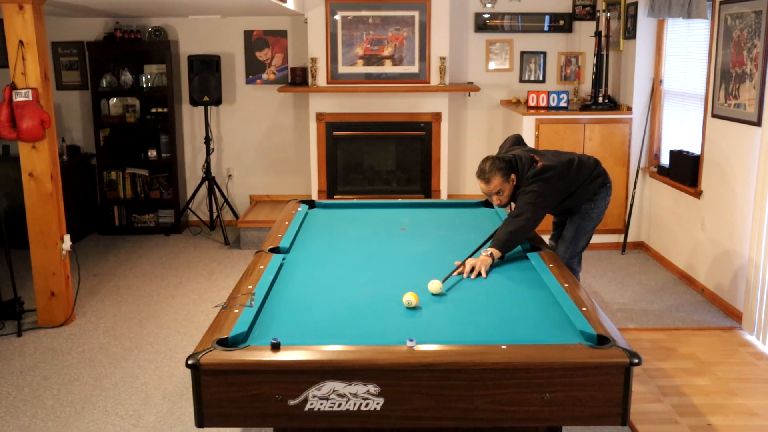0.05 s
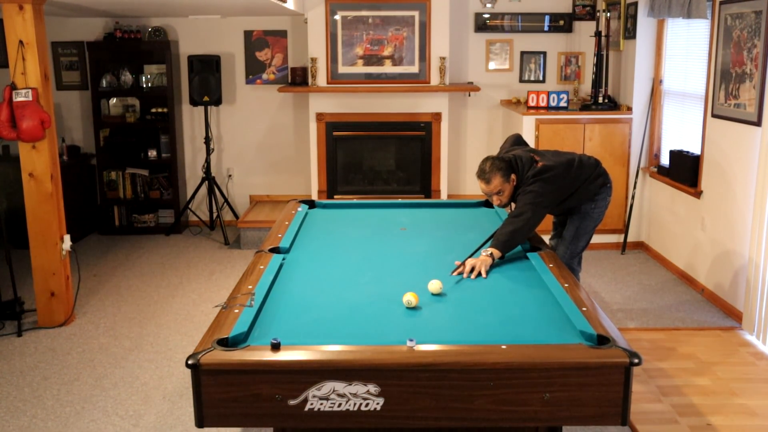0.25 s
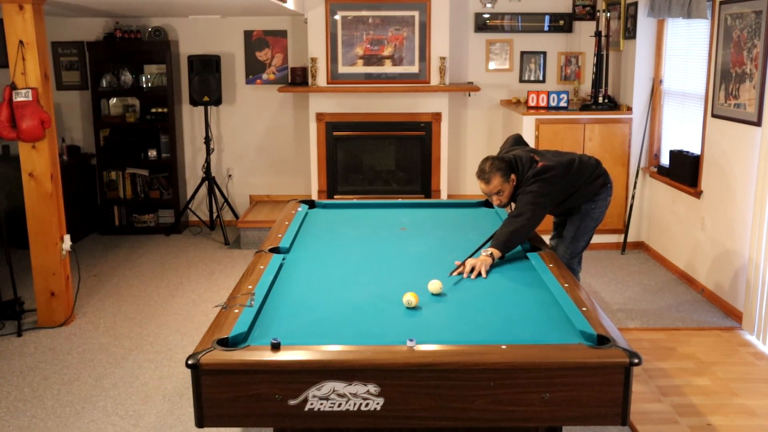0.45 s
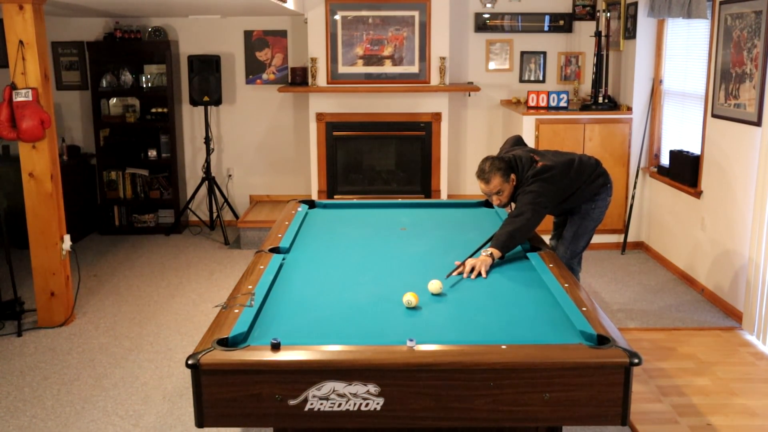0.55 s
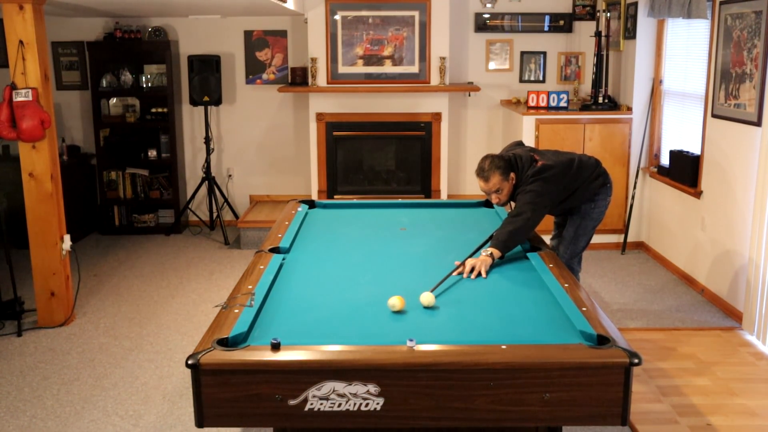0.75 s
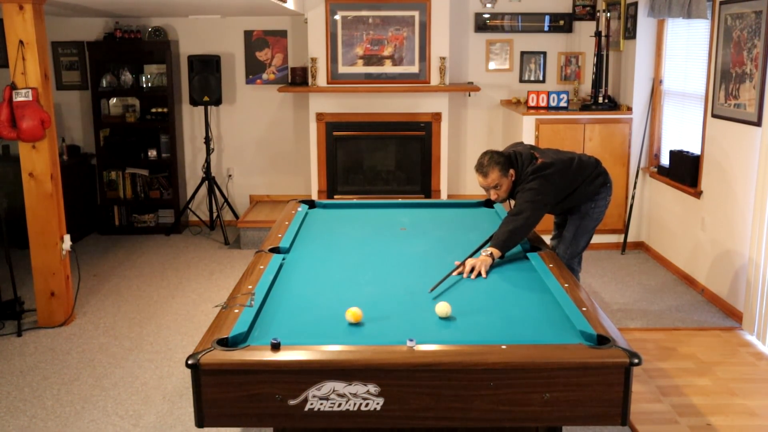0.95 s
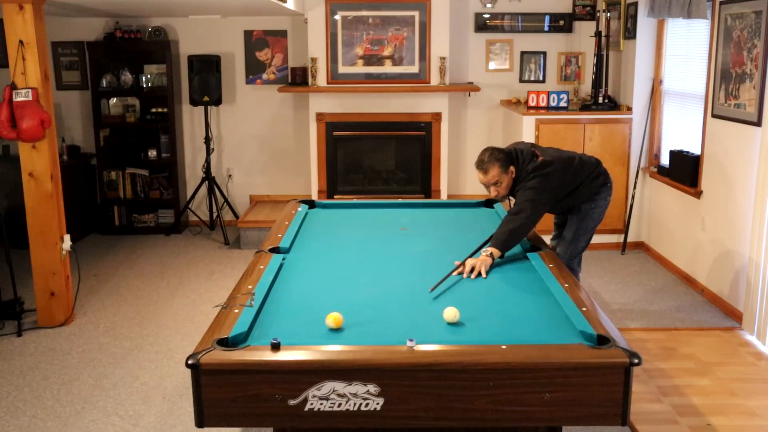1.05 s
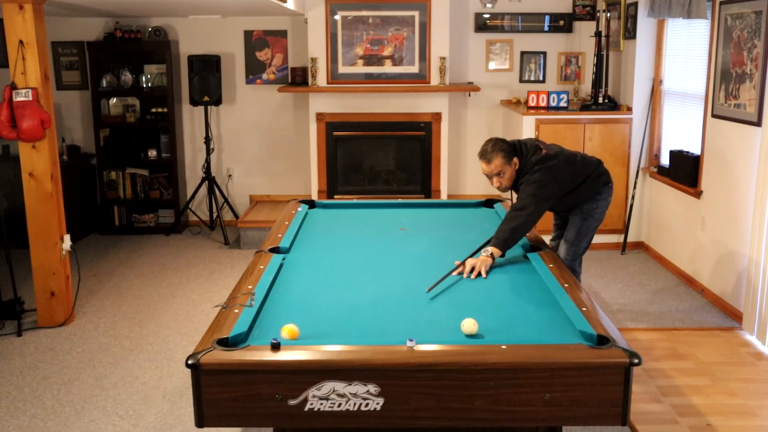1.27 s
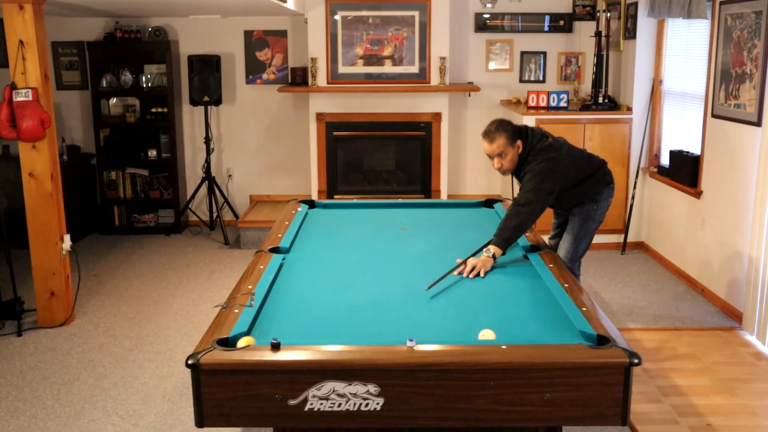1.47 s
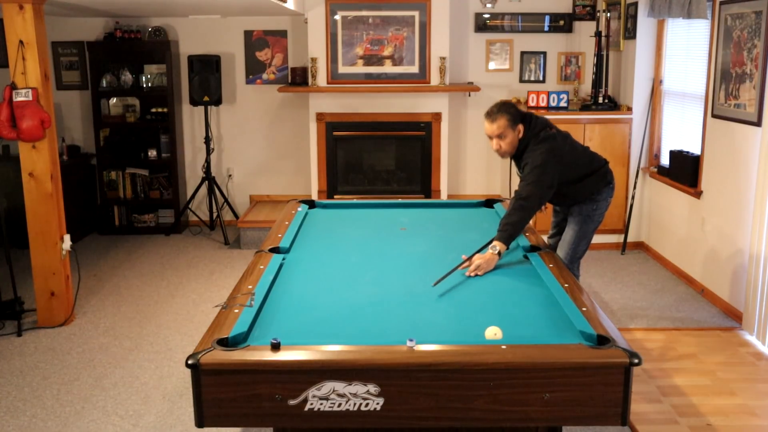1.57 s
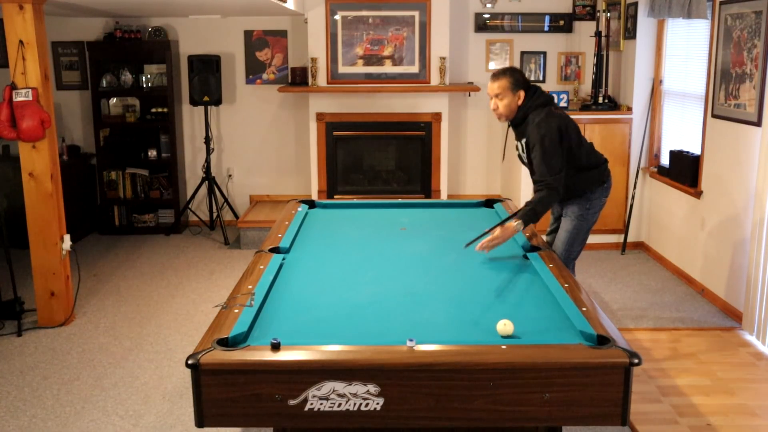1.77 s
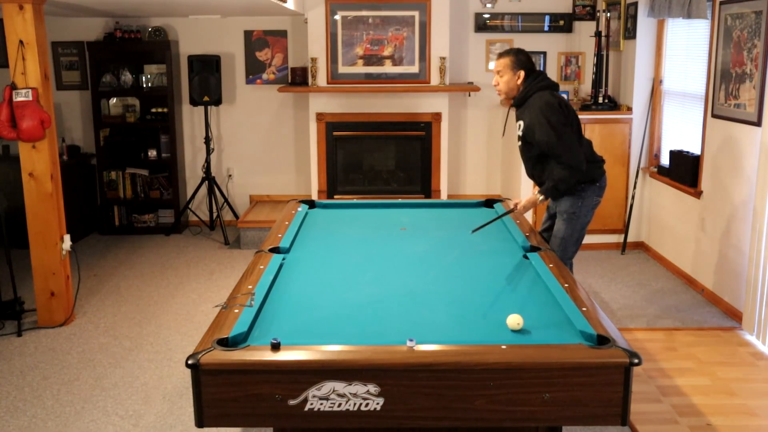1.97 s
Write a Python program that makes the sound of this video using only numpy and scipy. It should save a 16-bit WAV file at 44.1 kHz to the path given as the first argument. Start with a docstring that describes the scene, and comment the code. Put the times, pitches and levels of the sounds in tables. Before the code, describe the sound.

A pool shot: cue tip knock, sharp ball click, then a ball clattering into a pocket

```python
"""Pool shot, furnished game room

One microphone hears each source directly and through the room, over a faint hum and hiss.
The cue tip knocks and the shaft rings (noise burst and dying sines); the ball clicks into a second ball
(a brief force pulse) and thumps on the slate (modes and dull noise). That ball rolls to a corner pocket,
knocks into its liner (hollow noise), clacks against the balls lying there and drops with a low boom."""
import sys
import numpy as np
from scipy import signal
from scipy.fft import rfft, irfft, next_fast_len
from scipy.io import wavfile

SR = 44100
rng = np.random.default_rng(int(sys.argv[2]) if len(sys.argv) > 2 else 0)


def waveform_to_disk(signal):
    """Save audio, clipped to [-1, 1], as 16-bit WAV at the path in sys.argv[1]."""
    frames = np.transpose(np.atleast_2d(signal))
    scaled = np.clip(frames, -1, 1) * 32767
    samples = np.round(scaled).astype(np.int16)
    wavfile.write(sys.argv[1], SR, samples)


N = 88861
TIME = np.arange(N) / SR   # s

# In every noise colour the level per Hz is relative: the noise is then scaled to rms 1.
# Tones of the room hum, before their waver: [f/Hz, level/dB rms]
HUM_TONES = [(118.4, -74), (231.5, -67), (360.7, -71), (602.9, -72)]
HUM_WAVER, HUM_WAVER_HZ = .45, 6   # rms share of the strength, top of the waver
# Colour of the room noise: [f/Hz, level/dB per Hz]
AIR_COLOUR = [(25, -20), (60, -9), (110, 1.5), (180, -12), (260, -5), (400, -10.5), (620, -9.5), (900, -19),
              (1500, -25), (3000, -24), (8000, -28), (16000, -31)]
AIR_DB = -64.5
# Strength of the balls' rumble on the cloth: [t/s, level/dB]
ROLL_LEVEL = [(.72, -64.5), (.8, -56), (1.02, -57), (1.15, -59.5), (1.45, -60.5), (1.57, -59.5), (1.6, -50),
              (1.64, -55.5), (1.75, -47), (2.01, -48.5)]
# Colour of that rumble: [f/Hz, level/dB per Hz]
ROLL_COLOUR = [(35, -17.5), (70, -3.5), (140, 3.5), (280, 0.5), (550, -8.5), (1200, -15), (3000, -33)]
# Strength of the hiss: the shaft sliding before the stroke, then the player's rustle while straightening up:
# [t/s, level/dB]
RUSTLE_LEVEL = [(.55, -90), (.69, -68.5), (.78, -80.5), (1.1, -82.5), (1.2, -67.5), (1.3, -82), (1.45, -71),
                (1.58, -62.5), (1.75, -59), (1.88, -64), (2.01, -62)]
# Colour of that hiss: [f/Hz, level/dB per Hz]
HISS_COLOUR = [(500, -15), (1800, 1), (4000, -3), (7000, -5), (11000, -11.5), (16000, -24.5)]

# Tail of the room: [f/Hz, level/dB, t60/s]
ROOM_TAIL = [(60, 2, .6), (200, 4.5, 0.18), (500, -4, .35), (1000, -3.5, .35), (2000, -4.5, .37),
             (3050, -4, .35), (4000, -12.5, 0.57), (5500, -15.5, .3), (15000, -2.5, .25)]
# Early reflections from rails, ceiling and walls, before dulling: [delay t/s, level/dB]
REFLECTIONS = [(.0018, -21), (.0042, -20), (.0076, -17.5), (0.0185, -14.5), (.021, -19.5), (.03, -22.5),
               (.0474, -19.5)]
ROOM_BUILD_S, WALL_CUT_HZ = 0.0069, 3800

# Small ticks around the pocket: [t/s, ring level/dB, ring f/Hz, ring t60/s, snap level/dB]
POCKET_TICKS = [(1.6427, -31.5, 1006, 0.025, -39), (1.658, -31, 3800, 0.0091, -66),
                (1.66, -39, 5100, 0.011, -64), (1.6748, -34, 5030, 0.003, -28),
                (1.68, -44, 7550, 0.0037, -41), (1.938, -35, 3400, 0.013, -46)]
# Colour of a tick's snap: [f/Hz, level/dB per Hz]
SNAP_COLOUR = [(500, 6.5), (2000, 8), (4500, 4), (9000, -6), (15000, -9)]
SNAP_T60_S, TICK_ROOM_DB = 0.0064, -13

# A ball knocks into the pocket liner, level before softening:
# [t/s, level/dB, t60/s, pitch of the hollow f/Hz, top f/Hz]
LINER_KNOCKS = [(1.6733, -20, 0.071, 527, 1280), (1.684, -26, 0.054, 1150, 2510),
                (1.695, -29.5, 0.18, 496, 8900), (1.807, -34, 0.14, 617, 7000),
                (1.855, -36.5, 0.23, 394, 2980), (1.938, -33.5, 0.2, 504, 7100),
                (1.948, -38, 0.22, 296, 3020), (1.991, -41, 0.16, 800, 2000)]
# Colour of the liner: [f/Hz, level/dB per Hz]
LINER_COLOUR = [(40, -11), (80, -4.5), (140, -17), (300, -1.5), (1100, -2), (2000, -9), (4000, -18.5),
                (8000, -30), (15000, -40)]
HOLLOW_DB, HOLLOW_OCTAVES, KNOCK_ATTACK_S, POCKET_ROOM_DB = 6, .5, 0.0011, -2
DROP_S, DROP_DB, DROP_HZ, DROP_T60_S = 1.94, -36, 79, 0.41   # boom as the ball lands at the bottom

# Clacks of ball on ball in the pocket, level of the force pulse:
# [t/s, level/dB, contact t/s, room send level/dB, ring level/dB, ring f/Hz]
BALL_CLACKS = [(1.6829, -5.5, .00039, 4, -19, 2870), (1.6987, -8, .00044, -4.5, -26, 2980),
               (1.801, -16.5, 0.00042, 12, -20, 3030), (1.8073, -17, 0.00034, -12, -34.5, 3550),
               (1.8542, -26, 0.00031, 11.5, -31.5, 3500), (1.9489, -26, 0.00027, -9, -39, 3600),
               (1.9808, -42, 0.00027, 7, -40, 3300)]
CLACK_T60_S, CLACK_RING_ROOM_DB = 0.0094, -8

# Ringing of slate and frame, level relative to the thump: [f/Hz, level/dB, t60/s]
SLATE_MODES = [(69.88, -19, 1.5), (127.9, -8, 0.28), (174.2, -8, 0.19), (205.3, -5.5, 0.44),
               (280.8, -6.5, .37), (314.4, -9, 0.29), (506, 2, 0.05), (564, -2.5, .16), (635, -5.5, 0.12)]
# A ball's weight hits the table: [t/s, level/dB]
TABLE_THUMPS = [(.7205, -45), (0.8044, -31.5), (0.8303, -29), (1.012, -50), (1.694, -38.5), (1.9478, -40)]
# Dense, dull thud of the frame: [f/Hz, level/dB per Hz]
FRAME_COLOUR = [(40, -23.5), (90, -12), (140, -0.5), (320, 0), (420, -10.5), (580, -5.5), (900, -18),
                (2000, -41), (6000, -71.5)]
FRAME_DB, FRAME_T60_S, FRAME_ATTACK_S = -5, 0.29, 0.0018   # level relative to the thump
TABLE_ROOM_DB = -5.5

# Chalky scuff of the tip: [f/Hz, level/dB per Hz]
SCUFF_COLOUR = [(1500, -15), (3200, -7.5), (4000, 4.5), (5800, -6.5), (7600, -4.5), (10500, -11.5),
                (12000, -22.5), (16000, -33.5)]
SCUFF_DB, SCUFF_T60_S, SCUFF_ATTACK_S, SCUFF_ROOM_DB = -24.5, 0.012, .003, -3
SLIDE_DB, SLIDE_T60_S = -51.5, 0.16   # the shaft slides on through the fingers

# Pitches of the cue shaft: [f/Hz]
SHAFT_HZ = [476, 700, 910, 1169, 1356, 1623, 1782, 2042, 2345, 2645, 3710, 4315]
# Ringing at each of those pitches, level relative to CUE_DB: [level/dB, t60/s]
SHAFT_RINGING = [(-9.5, 0.16), (-4.5, .16), (-8.5, .16), (-5, 0.054), (0.5, 0.09), (-6.5, .085),
                 (-1.5, 0.11), (-5, .09), (-9, .07), (-20.5, .07), (-30, .035), (-27.5, 0.087)]
CUE_S, CUE_DB, CUE_ROOM_DB = 0.7192, -19, -16
# Knock of the leather tip: [f/Hz, level/dB per Hz]
TIP_COLOUR = [(50, -12.5), (150, -7.5), (300, -10.5), (510, 4.5), (620, -7.5), (820, -4), (1050, -16.5),
              (2200, -15), (3100, -35), (5000, -48.5), (16000, -76.5)]
TIP_DB, TIP_T60_S, TIP_ATTACK_S = -18, 0.068, .0006

CLICK_S, CLICK_DB, CLICK_CONTACT_S, CLICK_ROOM_DB = .8031, 6.5, .00038, 0   # level of the force pulse
BALL_RADIATES_HZ = 1350   # a ball radiates poorly below this
CRACK_S, CRACK_DB, CRACK_HZ = .8032, -10.5, 6130   # level of the impulse before softening

MIC_LOW_CUT_HZ, TOP_CUT_HZ = 43, 16828


def from_db(db):
    """Decibels to gain."""
    return 10 ** (np.asarray(db) / 20)


def fade(t60):
    """Exponential decay from 1, down 60 dB after t60 seconds."""
    return np.exp(-np.log(1000) * TIME / t60)


def swell(attack_s):
    """Soft onset, rising to 1."""
    return 1 - np.exp(-TIME / attack_s)


def level(points):
    """Gain over time, straight in dB between the points."""
    return from_db(np.interp(TIME, *np.transpose(points)))


def at_hz(points, hz, axis=1):
    """Read a table column on a log-frequency axis."""
    table = np.array(points)
    return np.interp(np.log(hz + 1e-9), np.log(table[:, 0]), table[:, axis])


def at(start_s, sound):
    """Start a sound at the given time."""
    return np.concatenate([np.zeros(int(start_s * SR)), sound, np.zeros(N)])[:N]


def soften(sound, top_hz):
    """Take the treble off."""
    b, a = signal.butter(2, min(top_hz, SR / 3), fs=SR)
    return signal.lfilter(b, a, sound + 1e-18)


def convolve(sound, response):
    """Pass a sound through an impulse response."""
    return signal.fftconvolve(sound, response)[:N]


def noise(colour, hollow_hz=None):
    """Coloured noise of rms 1, with an optional broad resonance."""
    size = next_fast_len(N)
    hz = np.fft.rfftfreq(size, 1 / SR) + 1e-9
    db = at_hz(colour, hz)
    if hollow_hz:
        octaves_away = np.log2(hz / hollow_hz)
        db = db + HOLLOW_DB * np.exp(-(octaves_away / HOLLOW_OCTAVES) ** 2)
    white = rng.standard_normal(size)
    coloured = irfft(rfft(white) * from_db(db), size)[:N]
    return coloured / coloured.std()


def ring(modes):
    """Struck modes: dying sines of alternating sign."""
    out = 0
    for k, (hz, db, t60) in enumerate(modes):
        sign = (-1) ** k
        out = out + sign * from_db(db) * fade(t60) * np.sin(2 * np.pi * hz * TIME)
    return out


def collision(contact_s):
    """Two hard balls meet: one brief elastic force pulse, radiated without its bass."""
    half_sine = np.sin(np.pi * np.minimum(TIME / contact_s, 1))
    force = np.maximum(half_sine, 0) ** (3 / 2)
    b, a = signal.butter(3, BALL_RADIATES_HZ, "high", fs=SR)
    return signal.lfilter(b, a, force + 1e-18)


def hum():
    """A few tones of fixed pitch whose strength wavers slowly at random."""
    out = 0
    for hz, db in HUM_TONES:
        waver = soften(rng.standard_normal(N), HUM_WAVER_HZ)
        strength = np.sqrt(2) * from_db(db) * (1 + HUM_WAVER * waver / waver.std())
        out = out + strength * np.sin(2 * np.pi * (hz * TIME + rng.random()))
    return out


def room_noise():
    """Steady coloured noise of the room."""
    return from_db(AIR_DB) * noise(AIR_COLOUR)


def rustle():
    """Bright hiss that comes and goes: the shaft sliding before the stroke, later the player's clothes as they
    move."""
    return level(RUSTLE_LEVEL) * noise(HISS_COLOUR)


def rolling():
    """Balls rolling on the cloth: low noise of changing strength."""
    return level(ROLL_LEVEL) * noise(ROLL_COLOUR)


def room_response():
    """A few dull reflections, then a diffuse tail that dies band by band."""
    edges = np.geomspace(40, 18000, 19)
    white = rng.standard_normal((2, N))   # neighbouring bands take turns, so they are independent
    tail = 0
    for k, (low, high) in enumerate(zip(edges, edges[1:])):
        centre_hz = np.sqrt(low * high)
        t60 = at_hz(ROOM_TAIL, centre_hz, axis=2)
        band_filter = signal.butter(2, [low, high], "band", fs=SR, output="sos")
        band = signal.sosfilt(band_filter, white[k % 2])
        even_energy = np.sqrt(2 * np.log(1000) / (t60 * SR))   # offsets the length of the decay
        tail = tail + band * fade(t60) * from_db(at_hz(ROOM_TAIL, centre_hz)) * even_energy
    reflections = sum(at(delay_s, [from_db(db)]) for delay_s, db in REFLECTIONS)
    return tail * swell(ROOM_BUILD_S) + soften(reflections, WALL_CUT_HZ)


def ticks():
    """Each tick is a snap of noise with one short ring."""
    out = 0
    for start_s, ring_db, hz, t60, snap_db in POCKET_TICKS:
        snap = from_db(snap_db) * noise(SNAP_COLOUR) * fade(SNAP_T60_S)
        out = out + at(start_s, ring([(hz, ring_db, t60)]) + snap)
    return out


def pocket():
    """Hollow noise knocks on the liner, and one low dying sine as the ball lands."""
    out = at(DROP_S, ring([(DROP_HZ, DROP_DB, DROP_T60_S)]))
    for start_s, db, t60, hollow_hz, top_hz in LINER_KNOCKS:
        liner = soften(noise(LINER_COLOUR, hollow_hz), top_hz)
        out = out + at(start_s, from_db(db) * liner * swell(KNOCK_ATTACK_S) * fade(t60))
    return out


def clacks():
    """Collisions in the pocket, each with a brief bright ring; as (sound, room dB) pairs."""
    hits, rings = [], 0
    for start_s, db, contact_s, room_db, ring_db, hz in BALL_CLACKS:
        hits.append((at(start_s, from_db(db) * collision(contact_s)), room_db))
        rings = rings + at(start_s, ring([(hz, ring_db, CLACK_T60_S)]))
    return hits + [(rings, CLACK_RING_ROOM_DB)]


def table():
    """The slate rings in its modes and the frame thuds in dull noise under every thump."""
    slate = ring(SLATE_MODES)
    thud_envelope = from_db(FRAME_DB) * swell(FRAME_ATTACK_S) * fade(FRAME_T60_S)
    out = 0
    for start_s, db in TABLE_THUMPS:
        thud = thud_envelope * noise(FRAME_COLOUR)
        out = out + at(start_s, from_db(db) * (slate + thud))
    return out


def scuff():
    """The chalked tip bites on the ball, then the shaft hisses through the fingers."""
    bite = from_db(SCUFF_DB) * fade(SCUFF_T60_S)
    slide = from_db(SLIDE_DB) * fade(SLIDE_T60_S)
    return at(CUE_S, noise(SCUFF_COLOUR) * swell(SCUFF_ATTACK_S) * (bite + slide))


def cue():
    """The leather tip knocks as a noise burst and the shaft rings in its modes."""
    modes = [(hz, db, t60) for hz, (db, t60) in zip(SHAFT_HZ, SHAFT_RINGING)]
    shaft = from_db(CUE_DB) * ring(modes)
    knock = from_db(TIP_DB) * noise(TIP_COLOUR) * fade(TIP_T60_S)
    return at(CUE_S, (shaft + knock) * swell(TIP_ATTACK_S))


def crack():
    """Sharp edge of the click: one softened impulse."""
    return soften(at(CRACK_S, [from_db(CRACK_DB)]), CRACK_HZ)


def click():
    """The cue ball collides with the object ball."""
    return at(CLICK_S, from_db(CLICK_DB) * collision(CLICK_CONTACT_S))


def scene():
    """The table's sources reach the microphone directly and through the room, over the background."""
    background = hum() + room_noise() + rustle() + rolling()
    sources = [(ticks(), TICK_ROOM_DB), (pocket(), POCKET_ROOM_DB), *clacks(), (table(), TABLE_ROOM_DB),
               (scuff(), SCUFF_ROOM_DB), (cue(), CUE_ROOM_DB), (click(), CLICK_ROOM_DB)]
    direct = crack() + sum(sound for sound, _ in sources)   # the crack is heard only directly
    sent = sum(from_db(room_db) * sound for sound, room_db in sources)
    return (background + convolve(sent, room_response()) + direct)[None]


def record(dry):
    """The microphone loses the deep bass, full scale rounds the peaks, and the top is cut."""
    low_cut = signal.butter(2, MIC_LOW_CUT_HZ, "high", fs=SR, output="sos")
    thin = signal.sosfilt(low_cut, dry)
    limited = thin / (1 + thin ** 6) ** (1 / 6)
    top_cut = signal.cheby2(16, 75, TOP_CUT_HZ, fs=SR, output="sos")   # 75 dB down from here up
    return signal.sosfilt(top_cut, limited)


dry = scene()
out = record(dry)
waveform_to_disk(out)
```